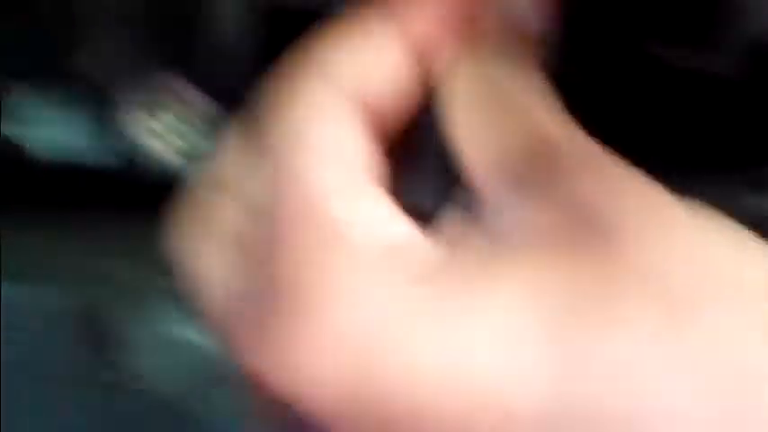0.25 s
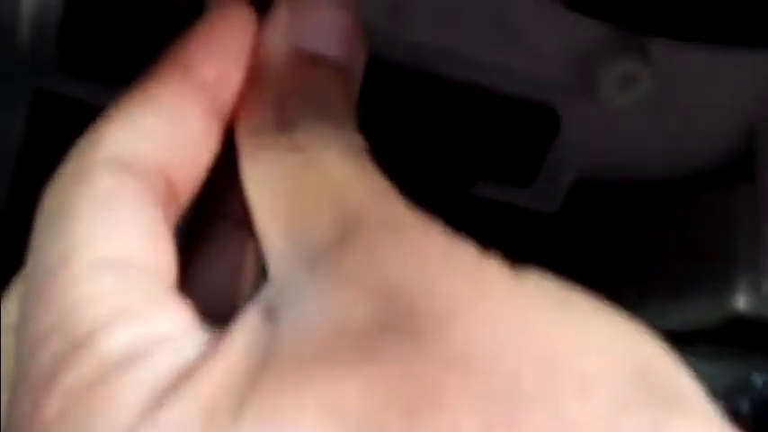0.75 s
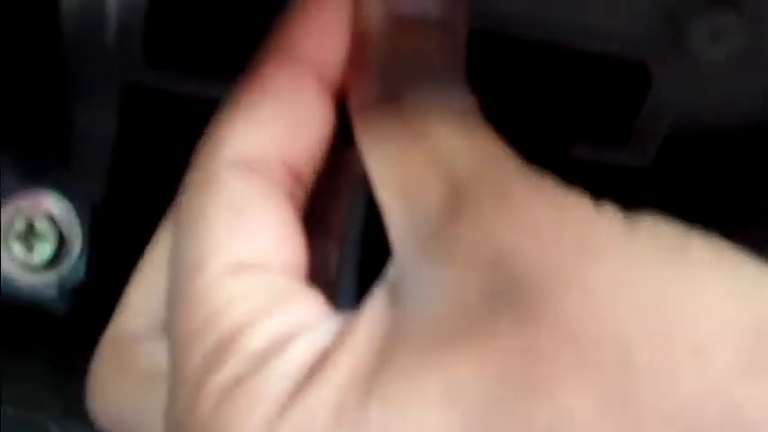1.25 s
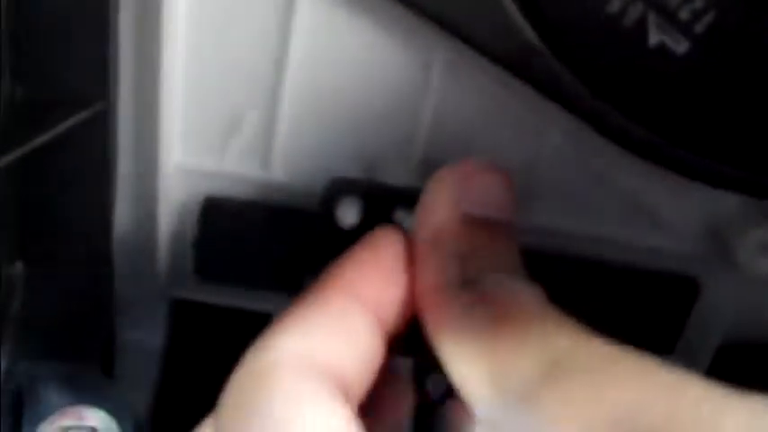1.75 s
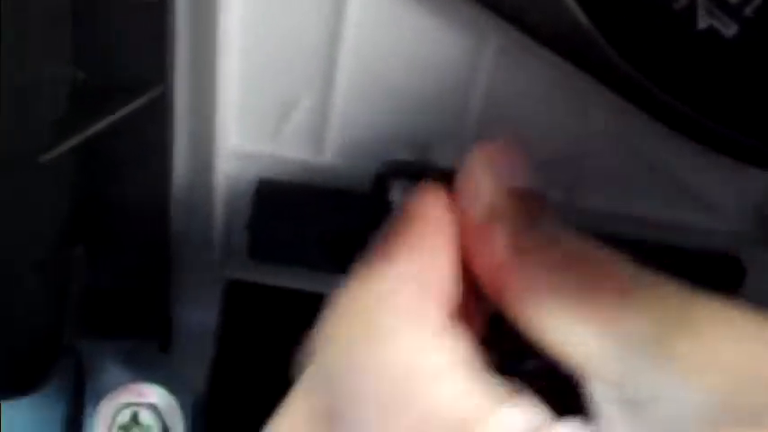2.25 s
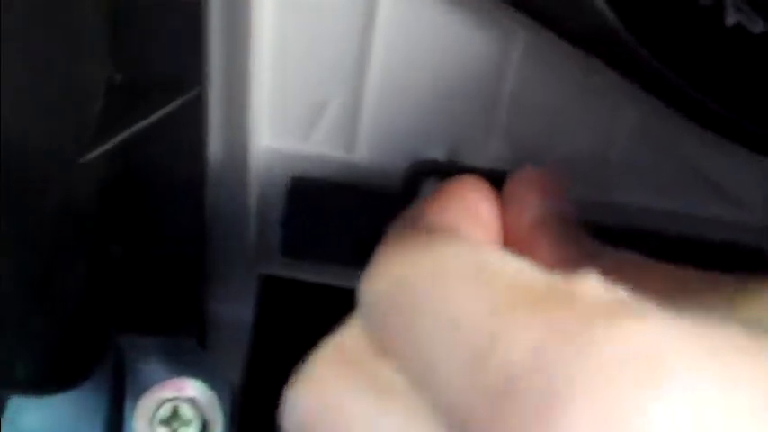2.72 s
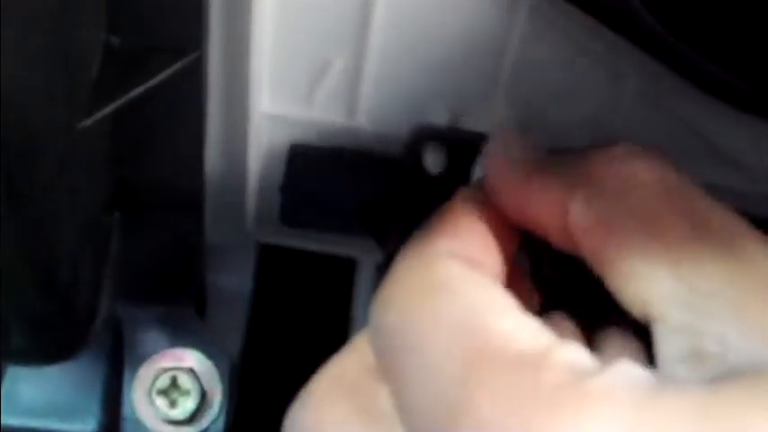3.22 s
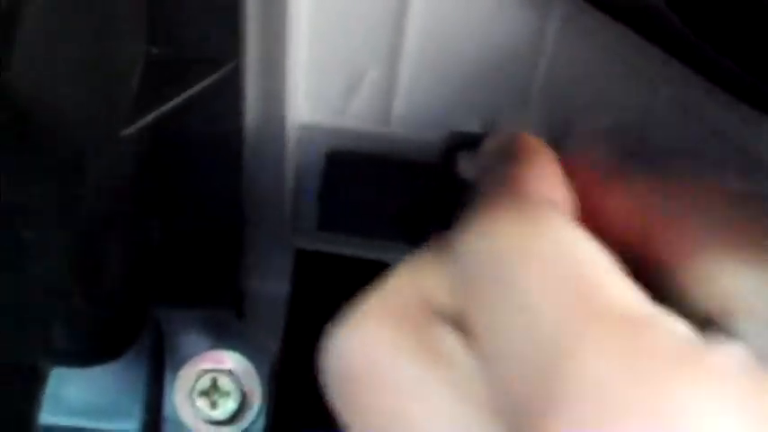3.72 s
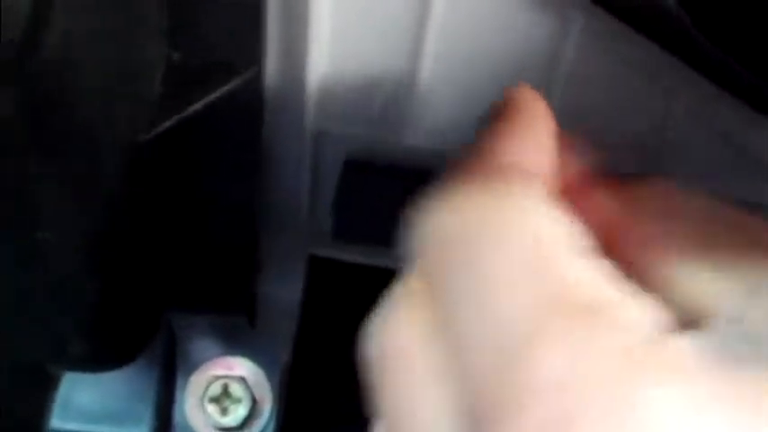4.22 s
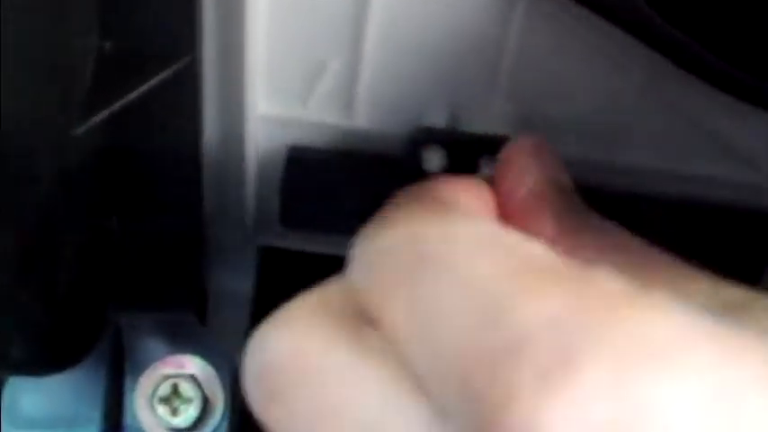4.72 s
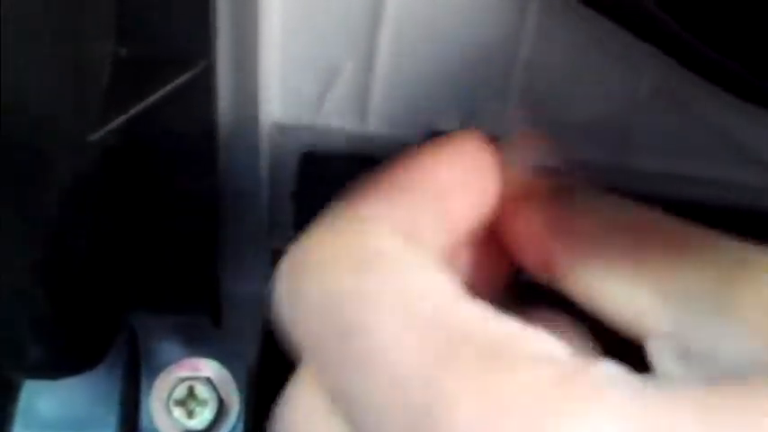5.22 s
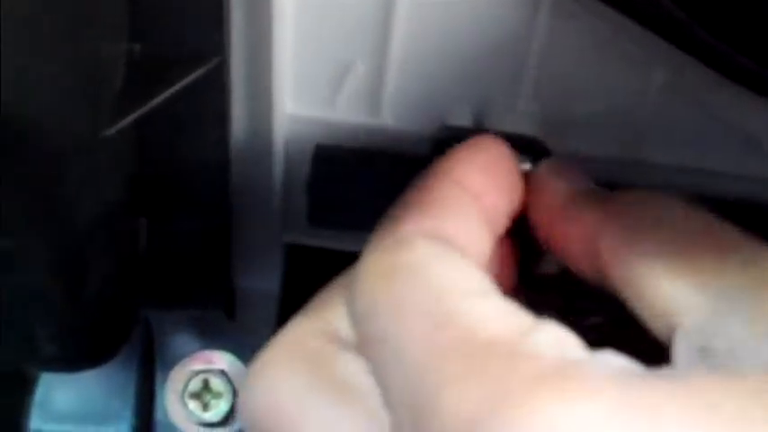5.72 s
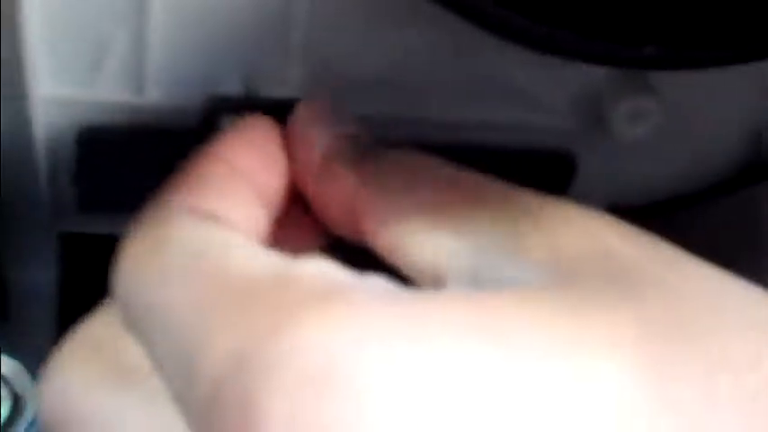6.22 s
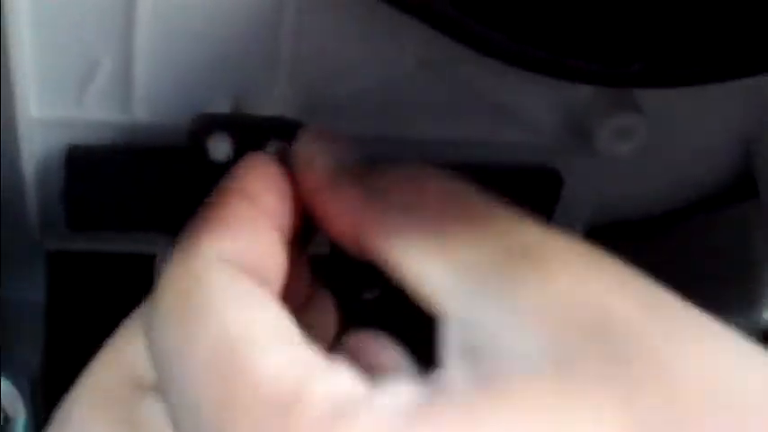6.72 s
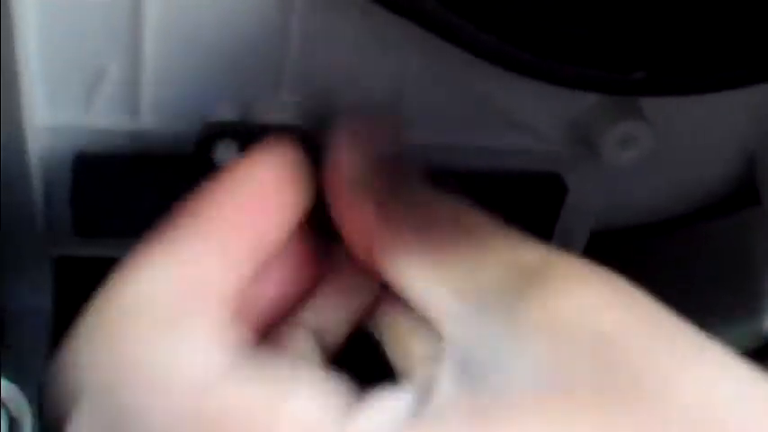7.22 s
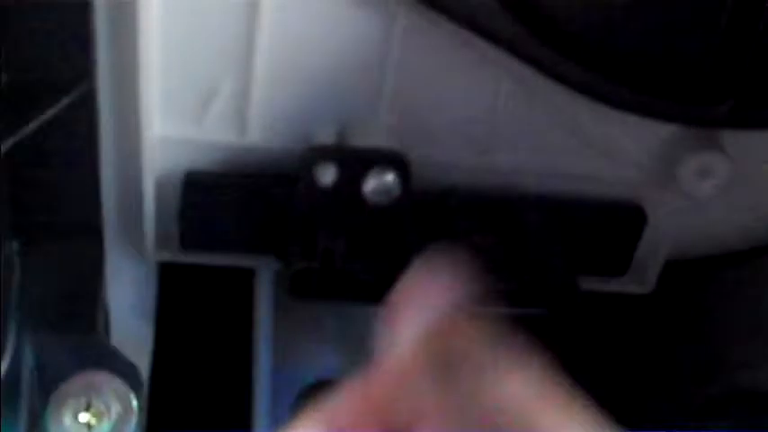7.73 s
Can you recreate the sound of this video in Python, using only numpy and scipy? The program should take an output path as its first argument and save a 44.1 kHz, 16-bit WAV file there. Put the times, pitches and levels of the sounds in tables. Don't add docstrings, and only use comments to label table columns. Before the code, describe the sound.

Low street rumble and soft hiss open the scene, the hiss strongest at first and returning at the end. A far engine hums faintly, swelling near 1.7 s, revving higher until about 3.5 s, dropping, and swelling again around 4.6 s. Close to the phone, a dull knuckle thud hits plastic at 0.3 s; small taps and scrapes follow, with a firm click at 1.3 s. At 1.5 s a steel shaft knocks the bracket hard, ringing briefly and overloading. From 2.2 to 4.3 s come uneven light clicks and gritty rubs, some bright near 3.1 s. Stronger taps cluster at 4.5 to 5.4 s. A tiny dry thread squeak sounds around 5.9 to 6.1 s. Rubs continue, duller in the treble, to a strong tap and scrape at 7.1 s, more fumbling near 7.4 s, then fading touches. Everything is dry, cramped and left-leaning.

```python
import sys
import numpy as np
from scipy import signal
from scipy.fft import rfft, irfft, next_fast_len
from scipy.io import wavfile
from scipy.ndimage import uniform_filter1d

SR = 44100
rng = np.random.default_rng(int(sys.argv[2]) if len(sys.argv) > 2 else 0)


def boost_factor(decibels):
    exponent = np.asarray(decibels, float) / 20
    return 10 ** exponent


def materialize(psi):
    bounded = np.clip(np.atleast_2d(psi).T, -1, 1)
    quanta = np.round(bounded * 32767).astype(np.int16)
    wavfile.write(sys.argv[1], SR, quanta)


N = 351036


def curve(rows, column):
    return np.interp(np.arange(N) / SR, [r[0] for r in rows], [r[column] for r in rows])


def on_log(rows, hz):
    return np.interp(np.log(hz), np.log([r[0] for r in rows]), [r[1] for r in rows])


def walk(rate):
    hold_ms = int(1000 / rate)
    steps = np.repeat(rng.standard_normal(8000 // hold_ms + 2), hold_ms)
    smooth = uniform_filter1d(uniform_filter1d(steps, hold_ms), hold_ms)
    return 1.3 * np.interp(np.arange(N) * 1000 / SR, np.arange(len(steps)), smooth)


# pitch_hz, level_db (per Hz)
STREET = [(15, -40.5), (25, -4.5), (129, -3), (213, -16.5), (554, -20), (868, -17.5), (1020, -20),
          (1330, -18.5), (2080, -25), (2710, -21), (2940, -23.5), (6850, -26.5), (14000, -41.5)]
STREET_DB = -49.5
# time_s, rumble_db, hiss_db
SWELL = [
    (0, 3.5, 5),
    (.5, 3.5, 3),
    (1.5, 1, -1.5),
    (4.5, 0.5, -1.5),
    (7, 2, -1.2),
    (7.6, 0.5, 0),
    (7.96, 1, 4.5),
]
# pitch_hz, likeness (0 to 1)
ALIKE = [(60, 1), (290, 0.29), (640, 0.81), (1400, 0.51), (3100, 0.05), (7000, 0.022)]
# pitch_hz, left_minus_right_db
STREET_LEFT = [(60, 6), (300, 4.5), (700, 5), (2400, 4), (4400, 4), (8100, 0.5), (14900, 1)]


def street():
    rumble_db, hiss_db = curve(SWELL, 1), curve(SWELL, 2)
    length = next_fast_len(N)
    f = np.fft.rfftfreq(length, 1 / SR)[1:]
    alike = np.clip(on_log(ALIKE, f), 0, 1)
    mid, side = (rfft(rng.standard_normal(length))[1:] for _ in range(2))
    both = np.array([np.sqrt(1 + alike) * mid + sign * np.sqrt(1 - alike) * side for sign in (1, -1)])
    both *= boost_factor(on_log(STREET, f) + np.array([[.5], [-.5]]) * on_log(STREET_LEFT, f))
    out = 0
    for hz in 22 * 2. ** np.arange(10):
        share = np.clip(1 - np.abs(np.log2(f / hz)), 0, 1)
        band = irfft(np.pad(both * share, ((0, 0), (1, 0))), length)[:, :N]
        swell_db = rumble_db if hz < 1000 else hiss_db
        out = out + band * boost_factor(swell_db + 2.2 * walk(4.3))
    return out * boost_factor(STREET_DB) / out.mean(axis=0).std()


def tone(rows, orders_db, wobble, flutter_db, rate):
    phase = 2 * np.pi * np.cumsum(curve(rows, 1) * (1 + wobble * walk(rate))) / SR
    wave = sum(boost_factor(db) * np.sin((k + 1) * phase) for k, db in enumerate(orders_db))
    first, last = rows[0][0], rows[-1][0]
    inside = np.interp(np.arange(N) / SR, [first - .01, first, last, last + 0.012], [0, 1, 1, 0])
    level_db = curve(rows, 2) + flutter_db * walk(rate) + np.array([[3], [-3]])
    return np.sqrt(2) * wave * inside * boost_factor(level_db)


# time_s, pitch_hz, level_db
ENGINE = [
    (0, 117.8, -62),
    (1.7, 123, -54.5),
    (2.3, 140.9, -62.5),
    (2.8, 151.2, -55),
    (3.55, 158.6, -66),
    (3.75, 128, -66.5),
    (4.6, 142.9, -54.5),
    (5.2, 122.6, -73),
    (7.96, 108.3, -64),
]


def far_engine():
    return tone(ENGINE, [0, -16], wobble=0.00866, flutter_db=1.5, rate=3.2)


# time_s, pitch_hz, level_db
SQUEAK = [
    (5.865, 1330, -66),
    (5.89, 1325, -57),
    (5.95, 1318, -52.5),
    (6.03, 1310, -55),
    (6.07, 1320, -68),
    (6.12, 1330, -64),
    (6.17, 1330, -79),
]


def thread_squeak():
    return tone(SQUEAK, [0, -7, -24], wobble=.016, flutter_db=4, rate=200)


def mode(x, hz, t60):
    r, w = np.exp(-np.log(1000) / (t60 * SR)), 2 * np.pi * hz / SR
    gain = np.sqrt(2 * (1 - r * r)) * np.sin(w)
    return signal.lfilter([gain], [1, -2 * r * np.cos(w), r * r], x)


def ports(ring, left_db):
    left_db = left_db + 1.1 * rng.standard_normal()
    left = boost_factor(left_db / 2) * np.roll(ring, rng.integers(0, 3))
    return np.array([left, boost_factor(-left_db / 2) * ring])


def knock(modes, hits):
    out, force, start = np.zeros((2, N)), np.zeros(8000), int(hits[0][0] * SR) - 10
    for s, db in hits:
        force[int(s * SR) - start] = boost_factor(db + 24.0)
    force = uniform_filter1d(force, size=3)
    rings = []
    for k, (hz, db, t60) in enumerate(modes):
        ring = (-1) ** k * boost_factor(db) * mode(force, hz, t60)
        rings.append(ports(ring, 7 - hz / 2500))
    out[:, start:start + len(force)] = sum(rings)
    return out


# pitch_hz, level_db, ring_s (fall of 60 dB)
THUD = [(171, -10.5, 0.078), (483, 0.5, 0.015), (586, 3, 0.01), (956, -4.5, 0.004), (1725, -15.5, .03),
        (2660, -18.5, 0.016), (3550, -18, 0.0073), (6030, -16.5, 0.00097)]
# start_s, level_db
THUD_BLOWS = [
    (0.3331, -23.5),
    (0.3383, -9.5),
    (0.3408, -17),
]


def knuckle_thud():
    return knock(THUD, THUD_BLOWS)


# pitch_hz, level_db, ring_s (fall of 60 dB)
SHAFT = [(603, -1.5, 0.047), (787, -15, 0.021), (1705, -5, 0.037), (2170, -10.5, 0.027), (2553, -2, 0.054),
         (2724, -1.5, 0.027), (3530, -3, 0.013), (4670, -8, 0.0048), (7070, 0.5, 0.02), (7770, -7, 0.011),
         (9300, -3.5, 0.0018), (11900, -20, 0.0099)]
# start_s, level_db
SHAFT_BLOWS = [
    (1.5023, -36),
    (1.5047, -12.5),
    (1.5057, -18.5),
    (1.5072, -18),
]


def shaft_knock():
    return knock(SHAFT, SHAFT_BLOWS)


APART = 0.28


def shares(db, bright_db, bracket_db):
    return db - max(bright_db, 0), db + bracket_db - APART * max(bright_db, 0), db + min(bright_db, 0)


# peak_s, length_ms, level_db, bright_db
TIP_DRAGS = [
    (0.838, 14, -46.5, 0),
    (1.327, 9.1, -51.5, -12),
    (6.468, 29, -58, 4),
    (7.51, 35, -63, -6),
]
# peak_s, length_ms, level_db, bright_db
TOOL_DRAGS = [(0.056, 150, -62, -16), (0.268, 59, -44.5, 0), (1.086, 10, -45.5, -9), (2.2, 36, -52, 1.5),
              (3.084, 19, -39.5, 12), (3.464, 100, -53, 0.5), (3.577, 74, -50.5, 1.5),
              (3.899, 36, -47, -12), (3.999, 36, -40.5, -3), (4.035, 45, -47, 2), (4.2, 36, -48.5, -6.5),
              (4.332, 43, -51.5, -14.5), (4.603, 32, -42, -3), (4.92, 120, -52, 0), (5.022, 35, -32, -5),
              (5.075, 41, -54.5, 0.5), (6.345, 28, -47, 2), (7.035, 97, -50, 1)]
# peak_s, length_ms, level_db, bright_db
TOOL_STRAINS = [(1.618, 25, -37.5, -10), (1.796, 20, -48, -2), (2.909, 42, -42.5, 4.5),
                (3.183, 28, -41.5, -6.5), (3.294, 41, -53.5, 3), (3.54, 86, -50, 0), (3.883, 23, -52.5, -6),
                (3.941, 100, -50.5, -3.5), (4.394, 31, -44, 7.5), (4.472, 18.4, -32, -5),
                (5.125, 42, -44.5, -3.5), (5.467, 20, -46.5, -7), (5.729, 15, -46, -11.5),
                (6.01, 46, -54.5, -6), (6.312, 28, -40.5, 4.5), (7.093, 29.6, -27, -8.5),
                (0.322, 71, -42, -10)]
# peak_s, length_ms, level_db, bright_db
FINGER_DRAGS = [(0.397, 100, -46, -3.5), (0.565, 15, -47.5, -4), (1.327, 20, -30.5, -25),
                (2.339, 59, -44.5, 9), (2.42, 35.7, -42, -1), (2.579, 14, -39, -16),
                (2.843, 28, -47.5, -19), (2.861, 22.5, -32, -7.5), (4.488, 15, -29.5, -17),
                (5.138, 22, -43, -3), (5.274, 28, -35.5, -6.5), (5.315, 36.4, -33.5, 5),
                (5.363, 15, -41.5, -14.5), (5.434, 15, -42, -6), (5.687, 29, -51, 11.5),
                (5.862, 28, -35.5, -2), (6.139, 42, -44, -9), (6.366, 38, -45.5, 9),
                (6.57, 37, -37.5, 11.5), (6.593, 27, -36.5, 6), (6.695, 57, -52.5, -0.5),
                (7.25, 110, -52.5, 8.5), (7.337, 22, -35, -16), (7.398, 25, -34.5, 8), (7.672, 30, -45, 2),
                (7.064, 28, -40, 10), (7.146, 14, -53, 9)]
# peak_s, length_ms, level_db, bright_db
FINGER_STRAINS = [(0.444, 53, -39, -5), (1.068, 38, -48, -16), (1.645, 38, -45.5, -7.5),
                  (2.23, 16, -37.5, -17), (2.956, 39, -37, 3), (3.205, 33, -37, 8), (3.799, 14, -42.5, -7),
                  (4.988, 60, -43.5, -11), (5.663, 36, -50, 12), (6.047, 28, -44.5, -1),
                  (6.246, 43, -49.5, -3), (6.272, 13, -42.5, 5), (7.382, 59, -34, 31), (7.553, 34, -45, -5),
                  (7.88, 100, -60.5, 10), (5.85, 34, -45.5, 10), (2.53, 39, -56.5, 14),
                  (6.87, 85, -57.5, -18)]
TIP_DB, TOOL_DB, SKIN_DB = 11.5, -2.5, -10
DRAG_RISE, STRAIN_RISE = 0.32, 0.66


def pressure(part):
    power, t = np.zeros(N), np.arange(-4000, 5000)
    kinds = [(TIP_DRAGS, TIP_DB, DRAG_RISE),
             (TOOL_DRAGS, TOOL_DB, DRAG_RISE), (TOOL_STRAINS, TOOL_DB, STRAIN_RISE),
             (FINGER_DRAGS, SKIN_DB, DRAG_RISE), (FINGER_STRAINS, SKIN_DB, STRAIN_RISE)]
    for rows, bracket_db, rise in kinds:
        for s, ms, db, bright in rows:
            width = np.where(t < 0, rise, 1 - rise) * max(ms, 2) * SR / 1000
            at = int(s * SR) + t
            ok = (at >= 0) & (at < N)
            swell_db = shares(db, bright, bracket_db)[part] - 10 * (t / width) ** 2
            power[at[ok]] += (boost_factor(swell_db) ** 2)[ok]
    return np.sqrt(power)


def grit(share, scatter_db, judder_db):
    slips = (rng.random(N) < share) * rng.standard_normal(N)
    x = slips * boost_factor(scatter_db * rng.exponential(size=N) + judder_db * walk(250))
    return x / x.std()


# start_s, level_db, bright_db
TIP_TAPS = [
    (0.691, -36.5, -11),
    (0.833, -25.5, -5),
    (1.01, -33.5, -18),
    (2.416, -42.5, 2),
]
# start_s, level_db, bright_db
HEAD_TAPS = [(1.062, -40, -2), (1.086, -36.5, 1), (1.297, -33, -11), (1.323, -17, -2.5), (1.616, -29, -11),
             (1.792, -36, 0.5), (1.909, -31, -10), (2.244, -44, -21), (2.952, -37, 0.5), (3.864, -38, -16),
             (3.878, -33.5, -17.5), (4.202, -42, -12), (4.483, -17.5, -6), (4.598, -18.5, -9),
             (5.012, -25.5, 0), (5.023, -21.5, -5), (6.66, -42, -12), (7.335, -30.5, -14), (3.167, -40, -2),
             (5.996, -45, 3), ]
# start_s, level_db, bright_db
FINGER_TAPS = [(7.089, -13, -10.5), (0.351, -13, -37), (1.527, -21.5, -14), (1.666, -29.5, -25),
               (2.577, -33.5, -1), (2.609, -33, 13), (2.838, -37.5, -4), (2.857, -20, 7), (3.083, -26, 17),
               (3.2, -24.5, 15), (3.774, -25.5, -12), (3.796, -32, -23), (3.986, -32, -10.5),
               (4.456, -22.5, -15), (4.748, -30, -16), (4.87, -26.5, -26), (5.272, -26.5, 21),
               (5.384, -24.5, -1), (5.43, -37.5, -14), (5.858, -35, -16), (6.104, -30.5, -9),
               (6.132, -34.5, -1.5), (6.339, -24, 15), (5.163, -15, -18), (7.671, -31, -6)]
HEAD_DB, NAIL_DB = 4, -13
STEEL_RING_HZ, SKIN_RING_HZ = 4000, 5730


def taps():
    kinds = [(TIP_TAPS, TIP_DB, STEEL_RING_HZ), (HEAD_TAPS, HEAD_DB, STEEL_RING_HZ),
             (FINGER_TAPS, NAIL_DB, SKIN_RING_HZ)]
    return [(s, *shares(db, bright, bracket_db), hz)
            for rows, bracket_db, hz in kinds for s, db, bright in rows]


def tap_chatter():
    shape = (len(taps()), 600)
    chatter = (rng.random(shape) < .12) * rng.standard_normal(shape)
    chatter[:, 0] = 0.81
    chatter *= np.exp(-np.arange(600) / (1.8 * SR / 1000))
    return chatter / np.sqrt(np.sum(chatter ** 2, axis=1, keepdims=True))


def blows(part, colour_db, chatter):
    force, t = np.zeros(N + 600), np.arange(600)
    delay_s = .0017
    for (s, *db, _), c, rattle in zip(taps(), colour_db, chatter):
        force[int((s + delay_s) * SR) + t] += boost_factor(db[part] + c) * rattle
    return force[:N]


# pitch_hz, level_db, ring_s (fall of 60 dB)
PANEL = [(185.8, -14.5, 0.071), (229.5, -2, 0.055), (362, -25, 0.031), (417, -8, 0.036), (524, -0.5, 0.014),
         (635, 2.5, 0.025), (705.6, -3.5, 0.05), (831, -0.5, 0.033), (950, -4, 0.0065)]
# pitch_hz, level_db, ring_s
BRACKET = [(1095, -14.5, 0.019), (1360, -2, 0.027), (1663, -1.5, 0.013), (2090, -2, 0.0078),
           (2516, -6.5, 0.0088), (2746, 1, .024), (3095, -10.5, 0.0057)]
# pitch_hz, level_db, ring_s
SCREW = [(3815, -3.5, 0.039), (4100, -1, 0.019), (4860, -6.5, .007), (5606, 2, 0.0048), (6090, -5.5, 0.007),
         (6790, -4, 0.0031), (7870, -2, 0.002), (9010, -7.5, 0.0034), (11550, -8.5, 0.0023)]
LEFT_DB = [
    6,
    7,
    5.5,
]
TAP_DB = [
    13.5,
    13.5,
    15,
]
# low_hz, high_hz
REACH_HZ = [
    (90, 3700),
    (650, 2800),
    (2800, 12500),
]
# time_s, highest_rings_db
PINCH = [(0, 1.5), (1.3, 4), (2.5, -1.5), (3.1, 2), (4, 1), (4.5, 7.5), (5.2, -0.5), (5.6, 1.5), (6.3, -15),
         (6.7, -11.5), (7.1, -2), (7.4, -13), (7.96, 15.5)]


def handling():
    out, chatter = np.zeros((2, N)), tap_chatter()
    tap_hz, pinch = np.array(taps())[:, -1], curve(PINCH, 1)
    for part, modes in enumerate([PANEL, BRACKET, SCREW]):
        is_screw = part == 2
        rub = pressure(part) * grit(share=.4, scatter_db=1.91, judder_db=2.8)
        total = np.sqrt(sum(boost_factor(db) ** 2 for _, db, _ in modes))
        colours = rng.standard_normal((len(taps()), len(modes)))
        body = np.zeros((2, N))
        for (hz, db, t60), colour in zip(modes, colours.T):
            colour_db = 2 * colour - 8 * is_screw * np.abs(np.log2(hz / tap_hz))
            rub_force = rub * boost_factor(3 * walk(12))
            tap_force = boost_factor(TAP_DB[part]) * blows(part, colour_db, chatter)
            ring = mode(rub_force + tap_force, hz, t60)
            body += ports(ring * boost_factor(db) / total, LEFT_DB[part])
        if is_screw:
            treble = signal.butter(3, 6400, "highpass", fs=SR, output="sos")
            body += (boost_factor(pinch) - 1) * signal.sosfiltfilt(treble, body)
        reach = signal.butter(3, REACH_HZ[part], "bandpass", fs=SR, output="sos")
        out += signal.sosfilt(reach, body)
    return out


def footwell(x):
    out, middle = x.copy(), x.mean(axis=0)
    for ms, db in [(2.3, -25), (4.1, -18), (6.7, -18)]:
        sides = [np.roll(middle, int((ms + late_ms) * SR / 1000)) * g for late_ms, g in [(0, 2.03), (.37, 0.27)]]
        out += boost_factor(db) * np.array(sides)
    return out


def scene():
    close = footwell(handling() + shaft_knock() + knuckle_thud())
    return close + thread_squeak() + far_engine() + street()


# pitch_hz, step_db
COARSE = [(1000, -20), (2000, -10), (6000, -9), (8500, -1), (10500, 7), (13000, 11), (14500, 18)]


def gate(x, spread_db):
    hop, start, width = 1024, 769 - 1024, 32
    n = np.arange(2 * hop) + .5
    waves = np.cos(np.pi / hop * np.outer(np.arange(hop) + .5, n + hop / 2))
    basis = np.sqrt(2 / hop) * np.sin(np.pi * n / (2 * hop)) * waves
    blocks = np.pad(x, ((0, 0), (hop - start, 2 * hop - (N - start) % hop))).reshape(2, -1, hop)
    pairs = np.concatenate([blocks[:, :-1], blocks[:, 1:]], axis=2)
    lines = (pairs @ basis.T).reshape(2, -1, hop // width, width)
    hz = (np.arange(hop // width) + .5) * width * SR / (2 * hop)
    level = np.sqrt(np.mean(lines ** 2, axis=3)) + 1e-9
    quiet = np.minimum(level, 2 * np.median(level, axis=1, keepdims=True))
    step_db = on_log(COARSE, hz) + spread_db * rng.standard_normal(level.shape[1:])
    step = (quiet * boost_factor(step_db))[..., None]
    halves = (np.round(lines / step) * step).reshape(2, -1, hop) @ basis
    return (halves[:, 1:, :hop] + halves[:, :-1, hop:]).reshape(2, -1)[:, -start:N - start]


def low_pass(x):
    return signal.sosfilt(signal.butter(12, 15540, fs=SR, output="sos"), x)


def record(dry):
    dry = signal.sosfilt(signal.butter(2, 28, "highpass", fs=SR, output="sos"), dry)
    overloaded = np.clip(dry, -.93, .93)
    cut = signal.sosfilt(signal.ellip(8, .3, 60, 14400, fs=SR, output="sos"), overloaded)
    mix = gate(cut, spread_db=9.5)
    return low_pass(mix)


dry = scene()
out = record(dry)
materialize(out)
```